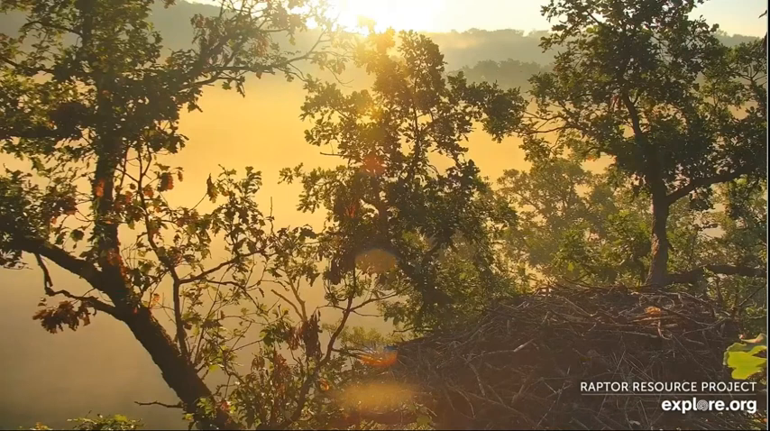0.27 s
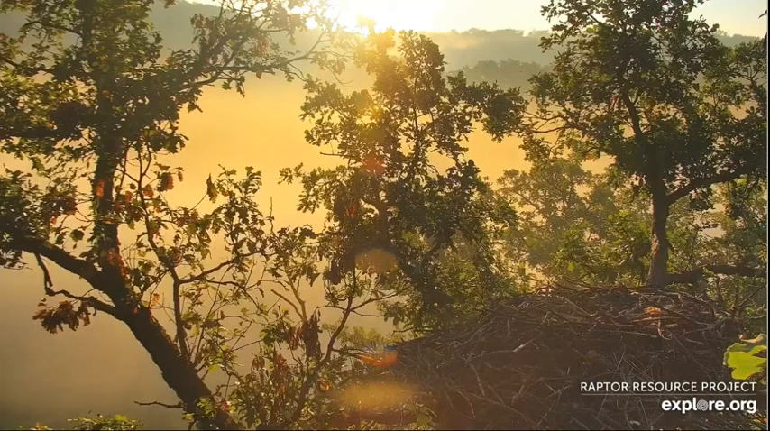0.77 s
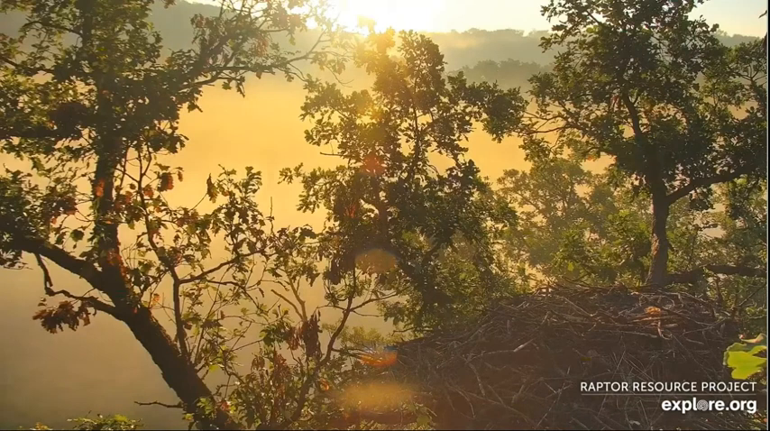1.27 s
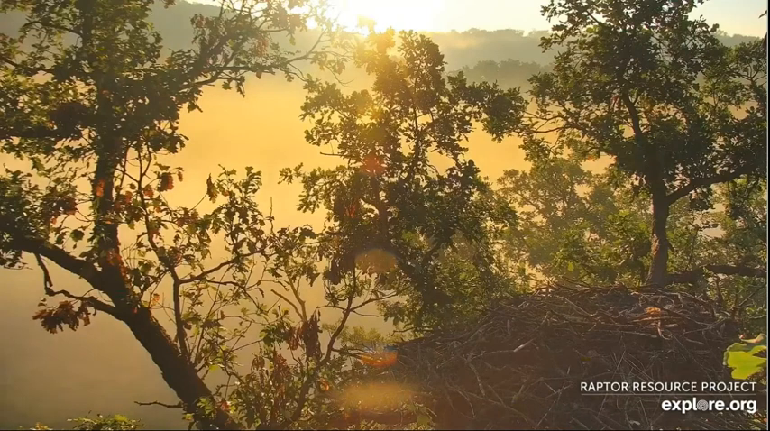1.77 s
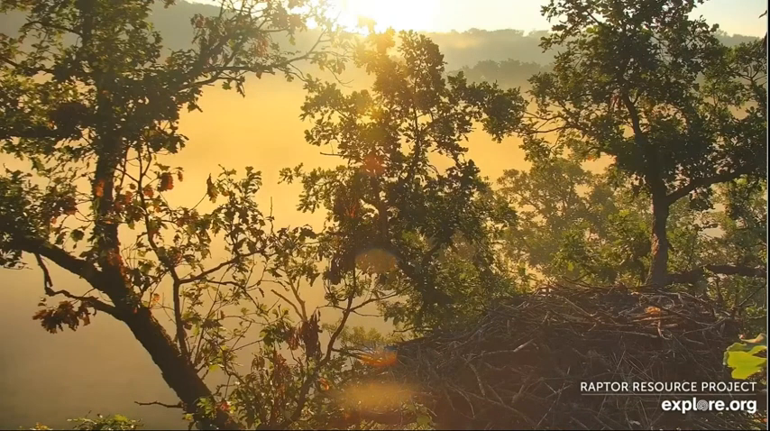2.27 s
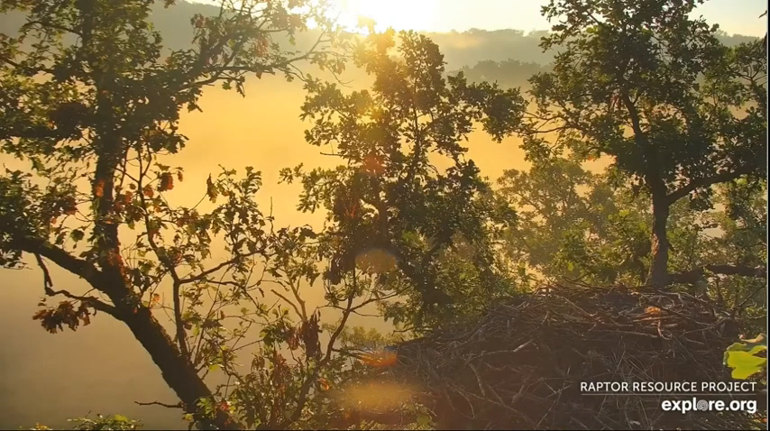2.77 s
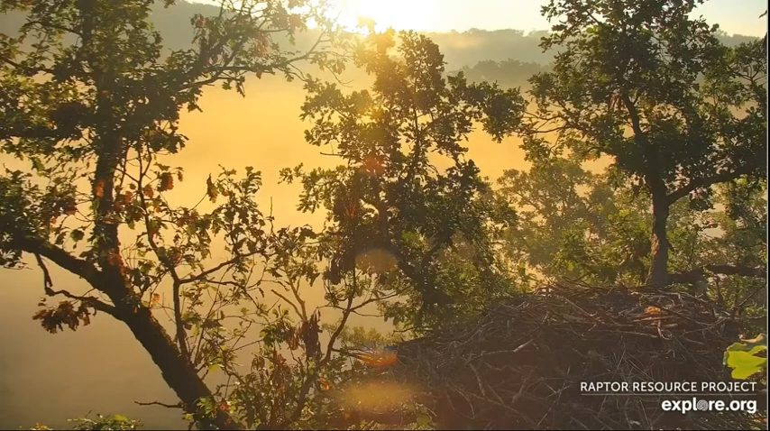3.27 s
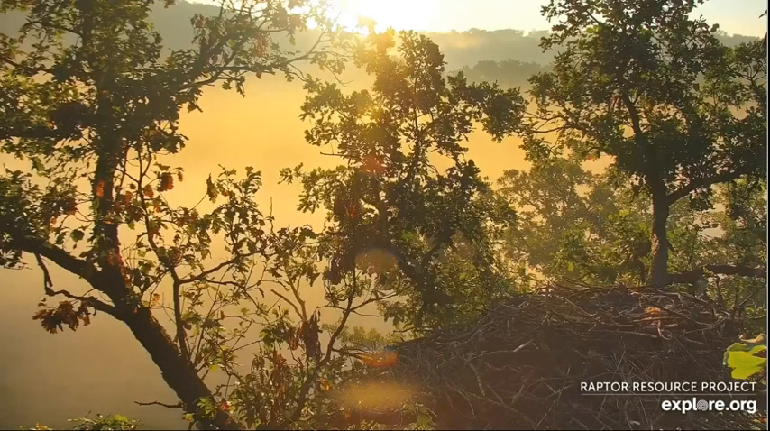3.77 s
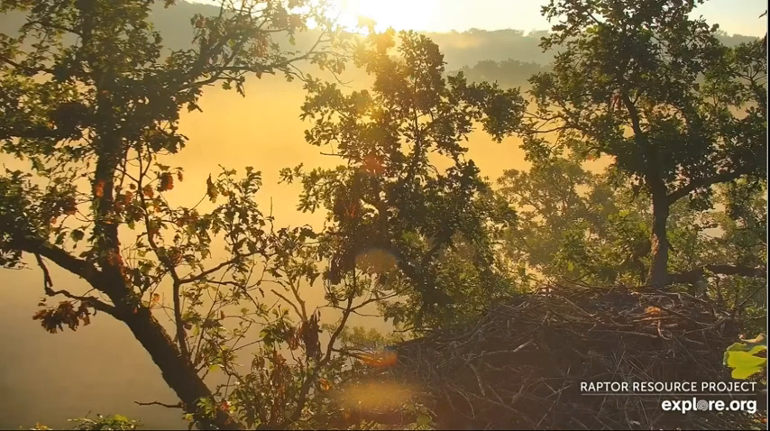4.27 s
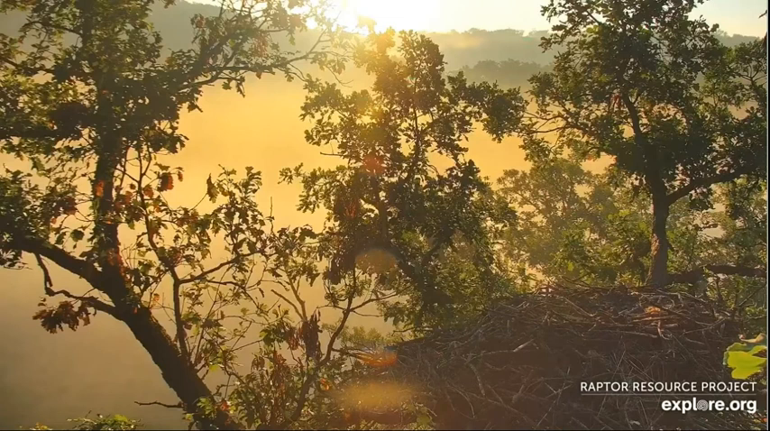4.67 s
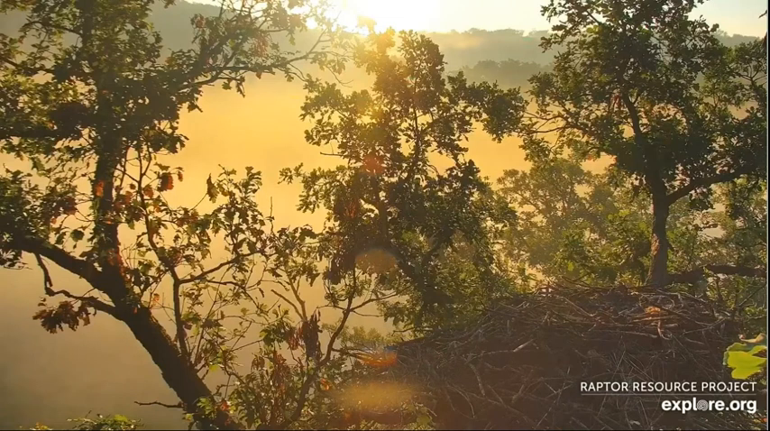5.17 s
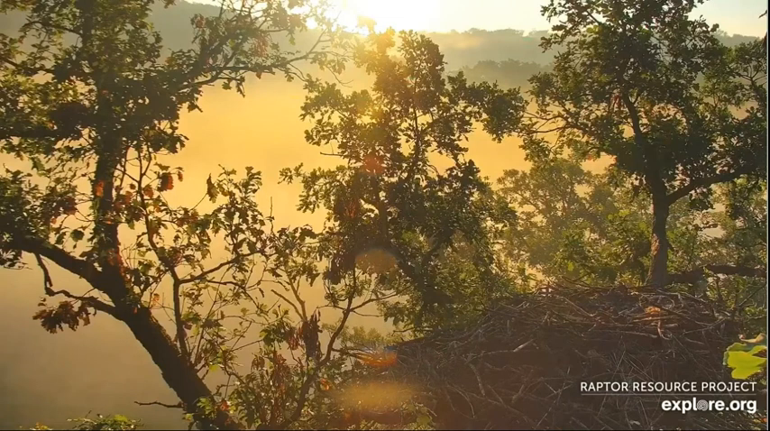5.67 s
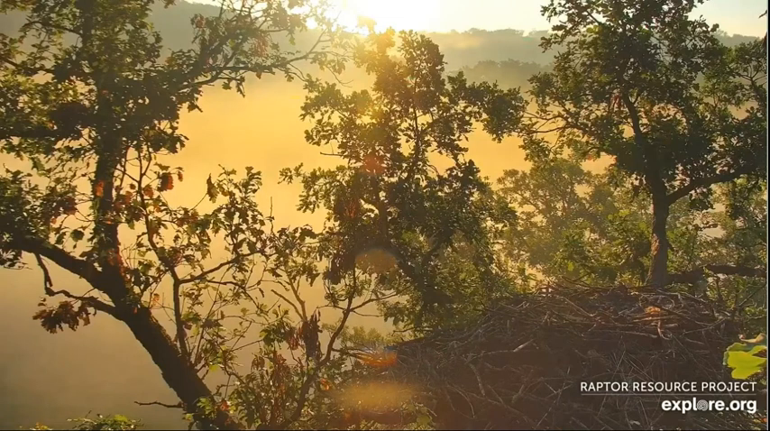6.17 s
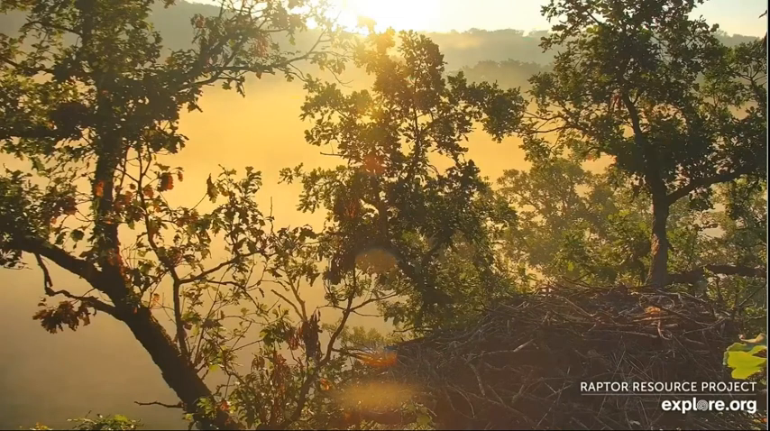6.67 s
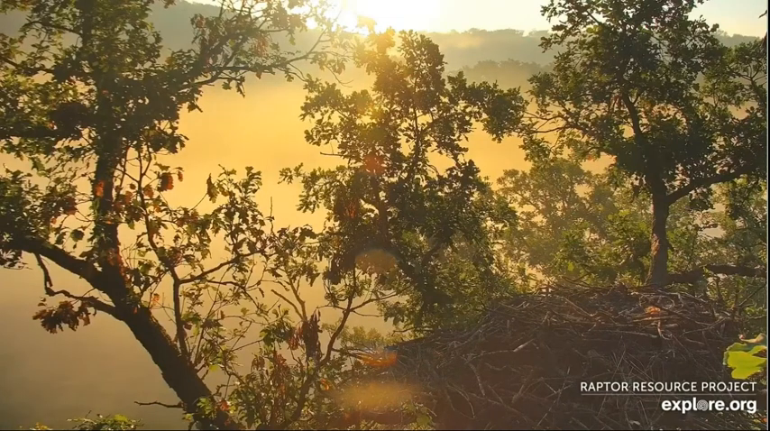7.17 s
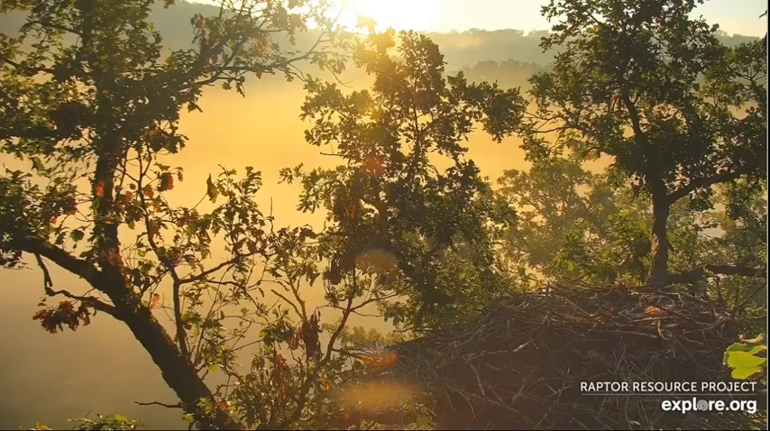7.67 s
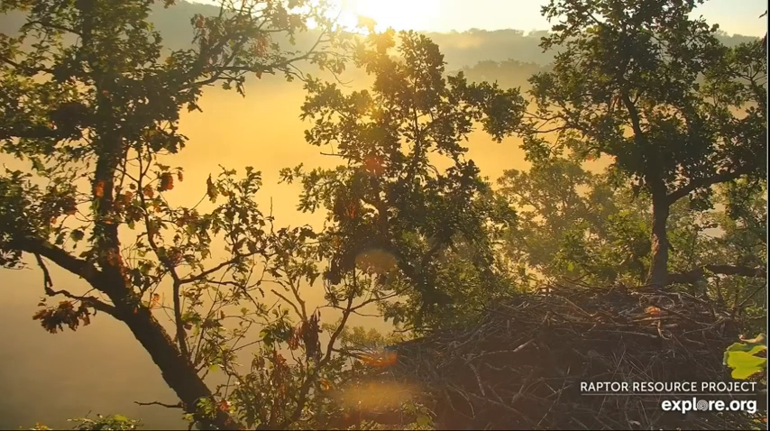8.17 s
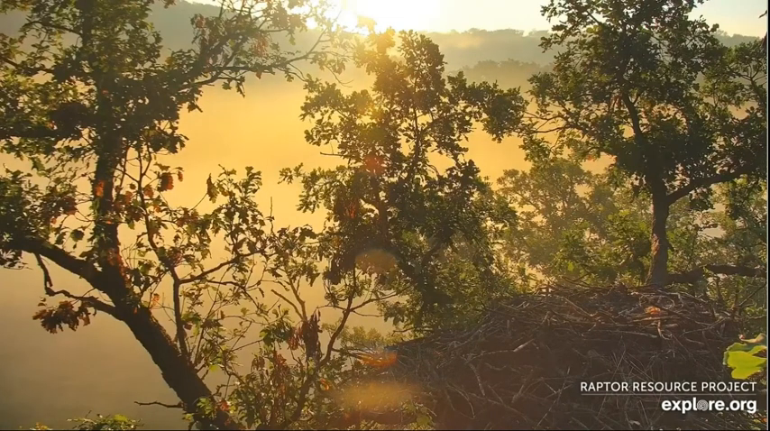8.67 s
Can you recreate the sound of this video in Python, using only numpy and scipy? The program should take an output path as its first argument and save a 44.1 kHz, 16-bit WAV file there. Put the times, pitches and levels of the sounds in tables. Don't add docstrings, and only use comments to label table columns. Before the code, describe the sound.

An outdoor microphone beside a large stick nest picks up constant low hum, soft valley rumble and light hiss. Quick high bird whips, falling whistles and chips come from near and far, with hoarse high calls from about three seconds. A dull wooden knock with a brief leaf rustle follows. Late on, a far cow moos once, rising and closing off, while birds continue.

```python
import sys
import numpy as np
from scipy import signal
from scipy.fft import rfft, irfft, next_fast_len
from scipy.io import wavfile
from scipy.ndimage import uniform_filter1d, map_coordinates

SR = 44100
rng = np.random.default_rng(int(sys.argv[2]) if len(sys.argv) > 2 else 0)


def waveform_to_disk(signal):
    frames = np.transpose(np.atleast_2d(signal))
    scaled = np.clip(frames, -1, 1) * 32767
    samples = np.round(scaled).astype(np.int16)
    wavfile.write(sys.argv[1], SR, samples)


def how_loud(loudness_db):
    steps = np.asarray(loudness_db, float) / 20
    return 10 ** steps


N = 392490


def unit(x):
    return x / np.sqrt(np.mean(x ** 2) + 1e-20)


def along(points, hz):
    f, v = np.transpose(points)
    return np.interp(np.log(hz + 1), np.log(f + 1), v)


def curves(rows):
    s, *cols = np.transpose(rows)
    return [np.interp(np.arange(N) / SR, s, c) for c in cols]


def wobble(rate_hz, size=N):
    knots = rng.standard_normal(int(size / SR * 400) + 4)
    return map_coordinates(knots, [np.arange(size) * rate_hz / SR])


def filtered(x, response):
    m = next_fast_len(N + 8192)
    return irfft(rfft(x, m) * response(np.fft.rfftfreq(m, 1 / SR)), m)[:N]


def rush(response, patchy_db):
    z = signal.stft(rng.standard_normal(N), nperseg=512)[2]
    field = uniform_filter1d(rng.standard_normal(z.shape), size=16, axis=0)
    noise = signal.istft(z * how_loud(patchy_db * unit(field)), nperseg=512)[1][:N]
    return unit(filtered(noise, response))


def turns(hz):
    return 2 * np.pi * np.cumsum(hz) / SR


def add(track, s, sound):
    part = track[round(max(s, 0) * SR):][:len(sound)]
    part += sound[:len(part)]


# (f/Hz, level/dB per Hz)
RUMBLE_SPECTRUM = [(15, -37.5), (27, -20), (45, -7), (70, -3.5), (110, 0.5), (170, -3.5), (330, -8.5),
                   (480, -18), (750, -29.5), (1200, -37), (1900, -48), (3000, -63)]


def valley():
    sway_db = .4 * wobble(3)
    return how_loud(-35.5 + sway_db) * rush(lambda f: how_loud(along(RUMBLE_SPECTRUM, f)), patchy_db=1.63)


# (f/Hz, width/Hz, level/dB)
ENGINE_DRONES = [
    (124.1, 8.4, -43.5),
    (166.2, 1.4, -48),
    (72, 6, -51),
]


def hum():
    level_db = -30 + 1.08 * wobble(9) + 1.2 * wobble(2.516)
    out = np.sqrt(2) * how_loud(level_db) * np.sin(turns(96.96 + 0.409 * wobble(.7)))
    for hz, width_hz, db in ENGINE_DRONES:
        out += how_loud(db) * rush(lambda f: 1 / (1 + (2 * (f - hz) / width_hz) ** 2), patchy_db=0)
    return out


# (f/Hz, peak level/dB, t60/s)
WOOD_KNOCK = (232, -12.5, .06)
# (length/s, f/Hz, width/Hz, level/dB)
LEAF_RUSTLE = (.07, 600, 450, -45)


def branch():
    knock_s, rustle_s, attack_s = 4.7, 4.715, 0.0036
    out, t = np.zeros(N), np.arange(SR // 5) / SR
    hz, db, t60 = WOOD_KNOCK
    add(out, knock_s, how_loud(db - 60 * t / t60) * (1 - np.exp(-t / attack_s)) * np.sin(2 * np.pi * hz * t))
    length, hz, width_hz, db = LEAF_RUSTLE
    puff = rush(lambda f: 1 / (1 + (2 * (f - hz) / width_hz) ** 4), patchy_db=0)[:int(length * SR)]
    add(out, rustle_s, how_loud(db) * puff * np.hanning(len(puff)) ** .5)
    return out


# (f/Hz, t60/s)
TREE_DECAY = [(100, 0.9), (2500, 0.41), (4500, 0.45), (9000, 0.22)]


def trees(x, wet_db, gap_s):
    hz, t, z = signal.stft(rng.standard_normal(SR), SR, nperseg=256)
    t60 = along(TREE_DECAY, hz)[:, None]
    near, far = how_loud(-60 * t / t60), how_loud(-14 - 60 * t / (3 * t60))
    tail = signal.istft(z * (near + far), SR, nperseg=256)[1]
    tail = np.pad(tail / np.linalg.norm(tail), (round(gap_s * SR), 0))
    return how_loud(wet_db) * signal.fftconvolve(x, tail)[:N]


def whistles(notes, overtones_db, flutter_db, rise, fall, warble):
    song = np.zeros(N)
    for s, length, a, b, c, db in notes:
        u = np.linspace(0, 1, int(length * SR))
        hz = a * (1 - u) * (1 - 2 * u) + 4 * b * u * (1 - u) + c * u * (2 * u - 1)
        phase = turns(hz * (1 + warble * wobble(300, size=len(u))))
        level_db = db + flutter_db * wobble(70, size=len(u))
        swell = unit(u ** rise * (1 - u) ** fall) * how_loud(level_db)
        overtones = how_loud(overtones_db) * (np.sin(2 * phase) + .5 * np.sin(3 * phase))
        add(song, s, np.sqrt(2) * swell * (np.sin(phase) + overtones))
    return song


def sung(rows, shape):
    length, start, end = shape
    return [(s, length, start * hz, hz, end * hz, db) for s, hz, db in rows]


def sung_each(rows):
    return [note for shape, *row in rows for note in sung([row], shape)]


# (t/s, length/s,
# middle f/Hz, swing/Hz, level/dB)
TRILLS_AND_HAZE = [(0, 0.095, 4340, 300, -56), (1.245, .85, 7000, 120, -73), (2.0, 0.19, 4330, 250, -64),
                   (3.02, .58, 3040, 400, -70), (4.297, 0.36, 2960, 350, -67), (3.876, .18, 5380, 350, -60),
                   (4.093, .22, 5630, 600, -60.5), (4.753, .24, 4400, 400, -64), (6.849, 1, 3043, 350, -72),
                   (7.6, .2, 7200, 598, -65.5), (7.748, .12, 5770, 352, -67), (7.903, 0.17, 6570, 900, -64.5),
                   (8.051, 0.2, 5750, 400, -60.5), (8.19, .18, 6950, 400, -66)]


def trills():
    sweeps_hz = 26
    song = np.zeros(N)
    for s, length, hz, swing_hz, db in TRILLS_AND_HAZE:
        size = int(length * SR)
        beat = turns(sweeps_hz * (1 + 0.17 * wobble(8, size=size)))
        notes = np.clip(np.sin(beat), 0, 1) * np.sin(np.linspace(0, np.pi, size)) ** 0.27
        level = 2 * how_loud(db + 1.2 * wobble(13, size=size))
        add(song, s, level * notes * np.sin(turns(hz + swing_hz * np.cos(beat))))
    return how_loud(-3.5) * song


# (t/s, length/s, f/Hz, level/dB)
LEVEL_WHISTLES = [(0.421, 0.11, 1577, -69.5), (0.803, 0.27, 4420, -76), (3.339, 0.051, 3870, -63),
                  (3.774, 0.076, 3050, -70.5), (3.86, .18, 2420, -81), (3.91, 0.12, 2590, -76),
                  (3.828, 0.097, 4070, -70.5), (4.402, 0.155, 2460, -72), (6.179, .27, 4200, -77),
                  (6.414, 0.24, 4300, -72), (6.46, .082, 4020, -73),
                  (1.29, 0.064, 7020, -72), (1.441, .038, 6960, -71), (1.747, .046, 4630, -75),
                 (2.189, .036, 5670, -77), (3.772, .054, 6740, -71), (4.622, 0.28, 4940, -68),
                 (4.794, .049, 5180, -70), (4.837, 0.17, 6000, -68), (5.58, .22, 5900, -75),
                 (7.015, .071, 6160, -67), (7.406, .069, 7240, -73), (7.511, 0.2, 6002, -71),
                 (7.552, .229, 6960, -76), (7.659, 0.12, 7820, -71.5), (7.743, .097, 5990, -70.5),
                 (7.837, .03, 6870, -71), (7.968, 0.053, 6810, -71), (8.048, 0.31, 5880, -71.5),
                 (8.406, 0.061, 5760, -69)]
# (length/s, start ratio, end ratio)
DIP, GLIDE, ARC = (0.202, 1.05, 1.06), (.36, 0.84, 0.97), (.084, .92, .87)
RAMP, LIFT, PIP = (0.12, .87, 1.17), (.22, .99, 1.03), (.016, 1.01, 0.96)
# (shape, t/s, middle f/Hz, level/dB)
BENT_NOTES = [
    (DIP, .279, 3560, -68.5),
    (GLIDE, .518, 4400, -65),
    (ARC, 3.255, 2360, -74),
    (RAMP, 4.7, 3100, -73),
    (RAMP, 5.14, 2750, -75),
    (LIFT, 7.315, 4800, -71.5),
]
# (t/s, middle f/Hz, level/dB)
PIP_NOTES = [(1.954, 2800, -71), (3.356, 1500, -64.5), (3.648, 2230, -70), (6.608, 2420, -75),
             (6.713, 5500, -63.5), (7.525, 2810, -65), (7.664, 2890, -66)]


def held_whistles():
    edge = 1 - .012
    held = [(s, length, hz * edge, hz, hz * edge, db) for s, length, hz, db in LEVEL_WHISTLES]
    notes = held + sung_each(BENT_NOTES) + sung(PIP_NOTES, PIP)
    return whistles(notes, overtones_db=-43.5, flutter_db=3, rise=0.18, fall=0.38, warble=0.0094)


# (t/s, middle f/Hz, level/dB)
BLUR_NOTES = [(2.145, 3300, -62), (3.032, 3350, -65.5), (3.172, 3190, -65), (3.283, 3290, -62.5),
              (3.378, 3420, -65), (3.523, 3190, -63), (4.017, 3400, -68), (7.901, 7170, -66.5),
              (8.2, 6850, -64)]


def blurs():
    notes = sung(BLUR_NOTES, (.047, 1.08, .9))
    return whistles(notes, overtones_db=-44.0, flutter_db=3.5, rise=.4, fall=0.29, warble=.012)


# (t/s, middle f/Hz, level/dB)
REED_NOTES = [
    (.673, 3220, -58),
    (1.77, 3240, -63),
]


def reeds():
    notes = sung(REED_NOTES, (.038, 1.1, 0.83))
    return whistles(notes, overtones_db=-1, flutter_db=3.0, rise=0.48, fall=0.5, warble=0.0046)


# (t/s, middle f/Hz, level/dB)
CHIPS = [
    (3.861, 5300, -55.5),
    (3.946, 5400, -63),
    (4.089, 5340, -55.5),
    (4.203, 5300, -56.5),
]


def chips():
    notes = sung(CHIPS, (0.0157, 1.2, .86))
    return whistles(notes, overtones_db=-40, flutter_db=1.5, rise=1.5, fall=.4, warble=.004)


# (t/s, middle f/Hz, level/dB)
SWOOP_NOTES = [(.815, 3060, -52.5), (.947, 3050, -54.5), (1.085, 3060, -55.5), (4.835, 4450, -61)]
TICK_NOTES = [(1.513, 3230, -73.8), (1.599, 3400, -73), (1.695, 3350, -68), (2.042, 2630, -69),
              (3.398, 3850, -64), (3.458, 3950, -64), (4.144, 3120, -64), (4.266, 3100, -63.5),
              (6.735, 3600, -74), (7.02, 3550, -73.5), (7.128, 3510, -68), (7.23, 3000, -69.5),
              (7.32, 3090, -72), (7.595, 3180, -66.5)]
STEP_NOTES = [(2.347, 3450, -69), (2.535, 3580, -70), (2.728, 3530, -68), (2.925, 3560, -71)]
# (length/s, start ratio, end ratio)
SWOOP, TICK, STEP = (0.049, 1.14, 0.71), (.02, 1.16, .84), (0.033, 1.5, 0.88)
DIVE, DROP, SLIDE = (.051, 1.13, 1), (.04, 1.06, .66), (.06, 1.3, .92)
# (shape, t/s, middle f/Hz, level/dB)
LONE_NOTES = [
    (DIVE, 1.951, 4500, -49),
    (DROP, 2.004, 4050, -52.5),
    (SLIDE, 3.12, 2450, -75),
    (SLIDE, 3.19, 2330, -75),
    (SLIDE, 3.672, 2100, -76),
]


def falling_whistles():
    notes = sung(SWOOP_NOTES, SWOOP) + sung(TICK_NOTES, TICK) + sung(STEP_NOTES, STEP) + sung_each(LONE_NOTES)
    return whistles(notes, overtones_db=-40.5, flutter_db=2.5, rise=.4, fall=1.0, warble=.008)


# (t/s, middle f/Hz, level/dB)
TINY_NOTES = [(6.661, 3780, -69.5), (6.8, 3720, -63), (6.937, 3700, -65), (7.074, 3680, -65.5)]


def tiny_whistles():
    delay_s, pitch_ratio = .018, .91
    feet = [(s + delay_s, hz * pitch_ratio, db) for s, hz, db in STEP_NOTES]
    notes = sung(TINY_NOTES, (0.014, .94, 0.93)) + sung(feet, (0.02, 1.3, 0.96))
    return whistles(notes, overtones_db=-48, flutter_db=1.5, rise=.4, fall=.4, warble=.004)


# (t/s, middle f/Hz, level/dB)
WHIP_NOTES = [(.438, 4270, -54), (1.185, 4480, -54.5), (1.346, 4510, -55.5), (2.245, 4500, -54.5),
              (2.389, 4400, -53.5), (3.521, 4570, -53.5), (3.657, 4380, -54.5), (5.319, 4540, -54),
              (5.445, 4530, -53), (5.594, 4280, -54), (8.259, 4800, -56.5), (8.412, 4520, -56),
              (8.584, 4350, -56)]
FLICK_NOTES = [(3.798, 3990, -55), (4.359, 3770, -56), (4.471, 3840, -55), (4.588, 3840, -54.5),
               (4.701, 3850, -55)]


def rising_whistles():
    notes = sung(WHIP_NOTES, (.048, .78, 1.106)) + sung(FLICK_NOTES, (.028, .84, 1.11))
    return whistles(notes, overtones_db=-45, flutter_db=2.5, rise=1.0, fall=0.71, warble=0.0061)


# (t/s, held f/Hz, level/dB)
HOOKED_NOTES = [(0.287, 5630, -53), (1.03, 5770, -57), (2.105, 5680, -55), (3.386, 5800, -57),
                (5.178, 5820, -57)]


def hooked():
    length_s, from_hz, drift_hz, slide_s = 0.067, 5040, 30, .009
    song = np.zeros(N)
    for s, high, db in HOOKED_NOTES:
        t = np.arange(int(length_s * SR)) / SR
        hz = np.linspace(high, high + drift_hz, len(t)) - (high - from_hz) * np.exp(-t / slide_s)
        shape = np.clip(t / .018, 0, 1) ** 2 * np.clip((length_s - t) / .03, 0, 1)
        level = np.sqrt(2) * how_loud(db + 1.6 * wobble(104, size=len(t)))
        add(song, s, level * shape * np.sin(turns(hz)))
    return song


# (t/s, length/s, level/dB, fade/dB per s)
NASAL_CALLS = [
    (2.791, 0.43, -54, 17),
    (4.138, .42, -63.5, 2),
    (5.559, .53, -61.5, 17),
]
# (ratio to pitch, level/dB)
NASAL_PARTIALS = [(4 / 5, -17), (5 / 5, 0), (6 / 5, -5)]


def nasal():
    top_hz, end_hz, lift_hz = 7360, 7030, 276
    rise_s, fall_s, fall_db = 0.0246, 0.12, 11
    song = np.zeros(N)
    for s, length, db, fade_db in NASAL_CALLS:
        t = np.arange(int(length * SR)) / SR
        rise = np.clip(t / rise_s, 0, 1)
        hz = np.linspace(top_hz, end_hz, len(t)) - lift_hz * (1 - rise)
        level_db = db - fade_db * t - fall_db * np.clip(1 - (length - t) / fall_s, 0, 1)
        gate = rise * np.clip((length - t) / .02, 0, 1)
        phase = turns(hz * (1 + .013 * wobble(170, size=len(t))))
        for ratio, part_db in NASAL_PARTIALS:
            flutter_db = 3.5 * wobble(87.5, size=len(t))
            add(song, s, gate * how_loud(level_db + part_db + flutter_db) * np.sin(ratio * phase))
    return np.sqrt(2) * song


def birds():
    singers = [(trills(), 3), (held_whistles(), -3), (blurs(), -1.5), (reeds(), -6), (chips(), -4),
               (falling_whistles(), -9), (tiny_whistles(), -5), (rising_whistles(), -4),
               (hooked(), -1.5), (nasal(), -3)]
    return sum(song + trees(song, wet_db=wet_db, gap_s=0.0055) for song, wet_db in singers)


# (t/s, f/Hz)
FOLD_PITCH = [
    (6.28, 73.64),
    (6.7, 74.28),
    (7.05, 80.53),
    (7.42, 101.5),
    (7.6, 117.8),
    (7.8, 158),
    (7.9, 171.9),
    (8.0, 175.7),
    (8.06, 172.5),
]
# (t/s, effort/dB, mouth opening 0-1)
BREATH_AND_JAW = [
    (6.41, -48, .25),
    (6.6, -46, 0.2),
    (7.0, -43.5, 0),
    (7.19, -37.5, 1),
    (7.534, -37.5, .45),
    (7.556, -32.5, 0.66),
    (7.682, -26.5, 0.58),
    (7.95, -26, 0.92),
    (8.095, -24.5, 0.87),
]
# (f/Hz, level/dB over effort)
CHEST_GAIN = [(74, 17.5), (100, -0.5), (118, 1.5), (135, 7), (176, 11)]
# (f/Hz, level/dB over effort)
OCTAVE_GAIN = [(147, 13.5), (156, -2.5), (178, 10.5), (200, 7.5), (232, -7.5), (268, -8), (320, -14.5),
               (350, -15.5)]
# (f/Hz, level/dB over effort)
THROAT_GAIN = [(200, -12.5), (430, -12.5), (540, -19.5), (620, -18.5), (700, -20), (830, -28.5), (875, -41),
               (960, -49.5), (1050, -41.5), (1200, -30.5), (1400, -30), (1530, -54.5), (1950, -50),
               (2300, -120)]


def cow():
    sag_hz_per_s, shut_s, slack_db = 820, .12, -1
    swell_s, swell_db, cut_s, cut_db = .14, 18, .036, 36
    t = np.arange(N) / SR
    first, last, slacken = BREATH_AND_JAW[0][0], BREATH_AND_JAW[-1][0], FOLD_PITCH[-1][0]
    hz = curves(FOLD_PITCH)[0] - sag_hz_per_s * np.clip(t - slacken, 0, .1)
    hz = uniform_filter1d(hz, size=SR // 40)
    effort_db, mouth = curves(BREATH_AND_JAW)
    mouth = mouth - np.clip((t - slacken) / shut_s, 0, 1)
    effort_db = effort_db - swell_db * np.clip((first - t) / swell_s, 0, 1)
    effort_db = effort_db - cut_db * np.clip((t - last) / cut_s, 0, 1)
    slack = np.clip(-np.gradient(hz) * SR / 400 - 1, 0, 1)
    phase = turns(hz * (1 + .003 * wobble(30) + .03 * slack * wobble(200)))
    voice = how_loud(effort_db + along(CHEST_GAIN, hz) + .6 * wobble(25)) * np.sin(phase)
    voice += how_loud(effort_db + along(OCTAVE_GAIN, 2 * hz) + 1.4 * wobble(20)) * np.sin(2 * phase)
    span = slice(round((first - swell_s) * SR), round((last + cut_s) * SR))
    closed = 1 - np.clip(mouth[span], 0, 1)
    for k in range(3, 26):
        partial_hz = k * hz[span]
        muffle_db = -30 * closed * np.clip(np.log2(partial_hz / 700), 0, 1)
        flutter_db = 2.2 * wobble(11, size=len(closed)) - slack_db * slack[span]
        level_db = effort_db[span] + along(THROAT_GAIN, partial_hz) + muffle_db + flutter_db
        voice[span] += how_loud(level_db) * np.sin(k * phase[span] + k * k)
    voice *= 1 + .085 * wobble(220)
    call = np.zeros(N)
    call[span] = np.sqrt(2) * voice[span]
    return call + trees(call, wet_db=-22, gap_s=.03)


def scene():
    return (valley() + hum() + branch() + birds() + cow())[None]


def roll_off(x):
    return signal.sosfilt(signal.butter(12, 16850, fs=SR, output="sos"), x)


# (f/Hz, level/dB per Hz)
HISS_SPECTRUM = [(800, -15), (1800, -19.5), (2300, -11), (3500, -6.5), (5000, -8.5), (6500, -7), (9500, -5),
                 (12000, -2), (15500, 0.5)]


def record(dry):
    expand, top_hz = 9, 15720
    hiss = how_loud(-58.0) * rush(lambda f: how_loud(along(HISS_SPECTRUM, f)) * (f < top_hz), patchy_db=2.5)
    gain = 1 + expand * uniform_filter1d(dry ** 2, size=SR // 175)
    return roll_off(dry * gain + hiss)


dry = scene()
out = record(dry)
waveform_to_disk(out)
```